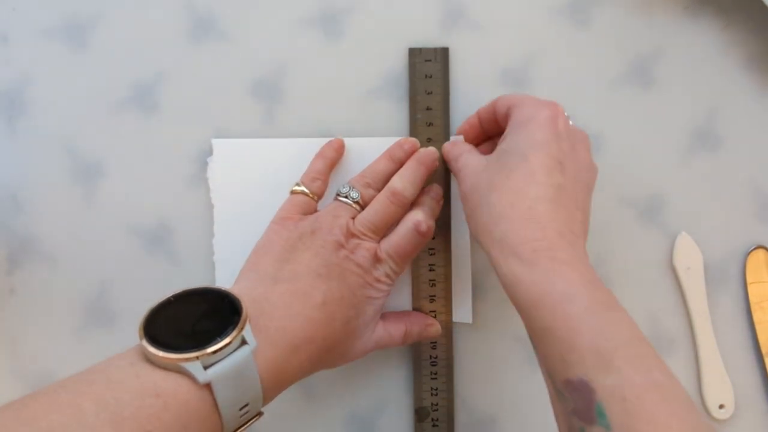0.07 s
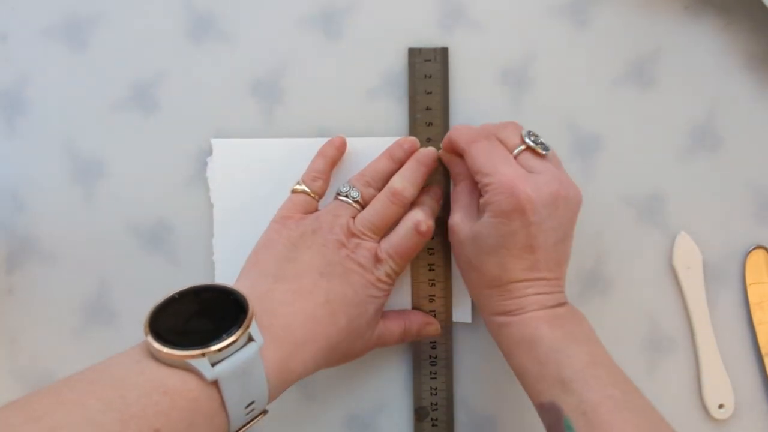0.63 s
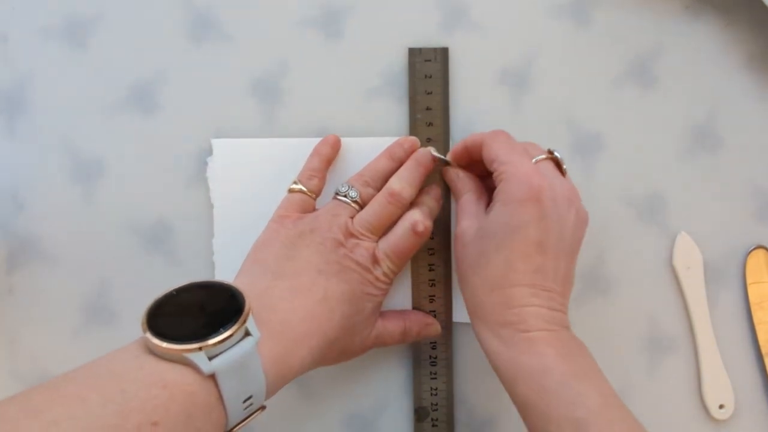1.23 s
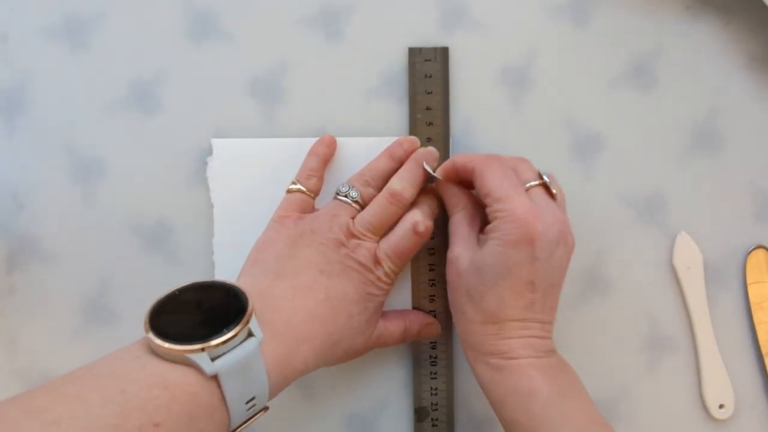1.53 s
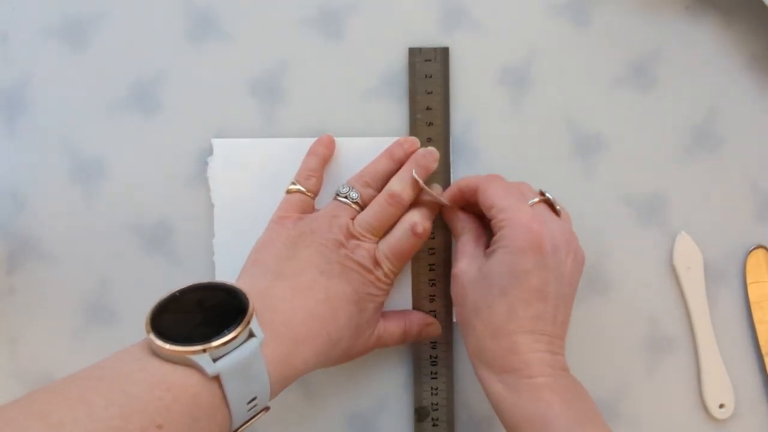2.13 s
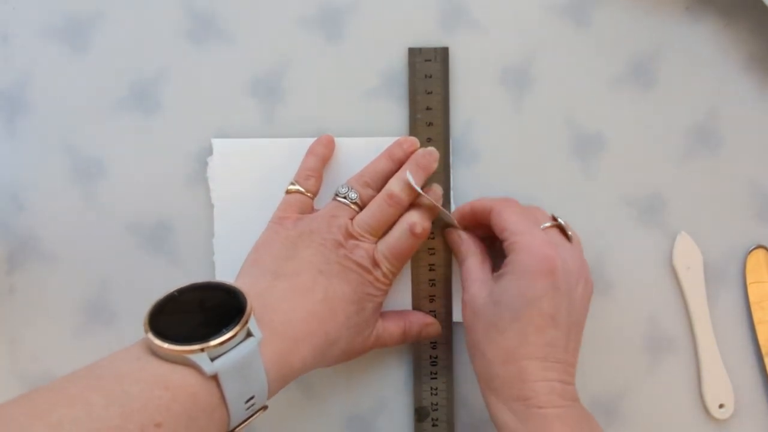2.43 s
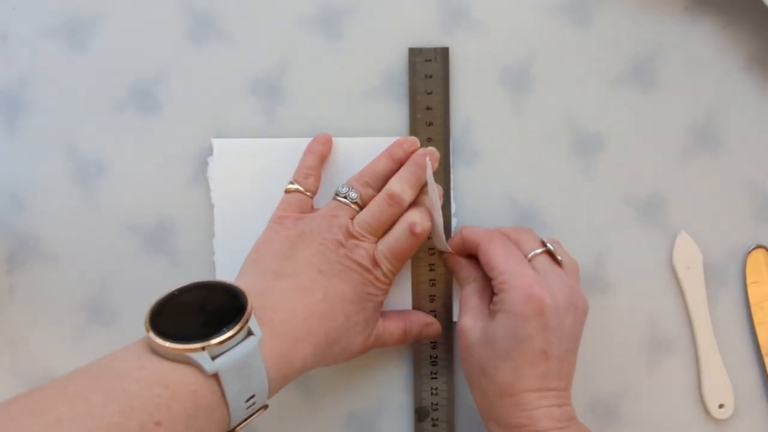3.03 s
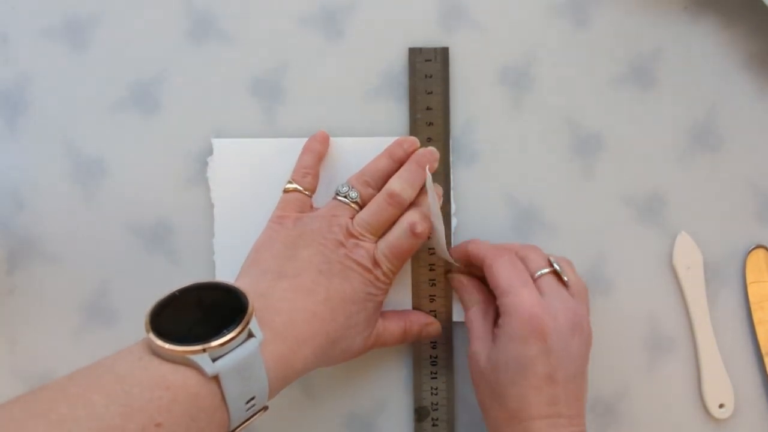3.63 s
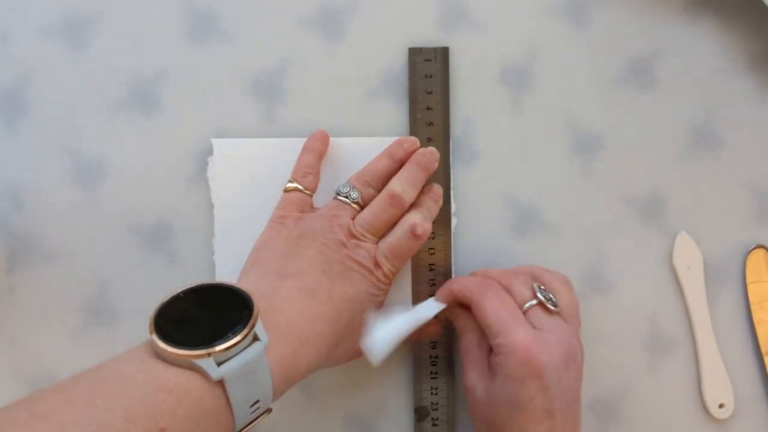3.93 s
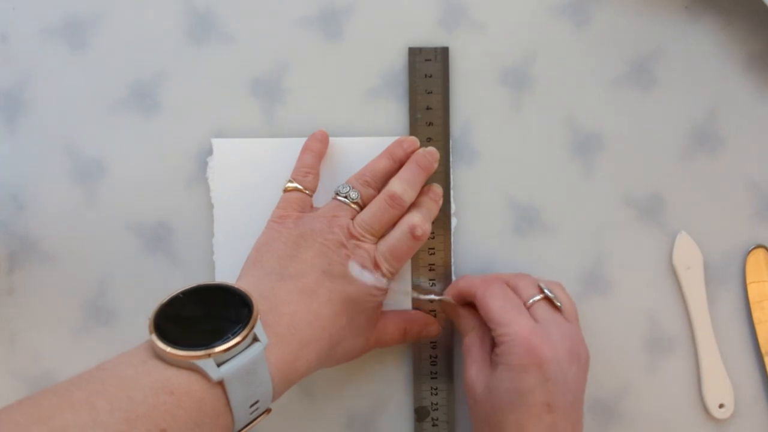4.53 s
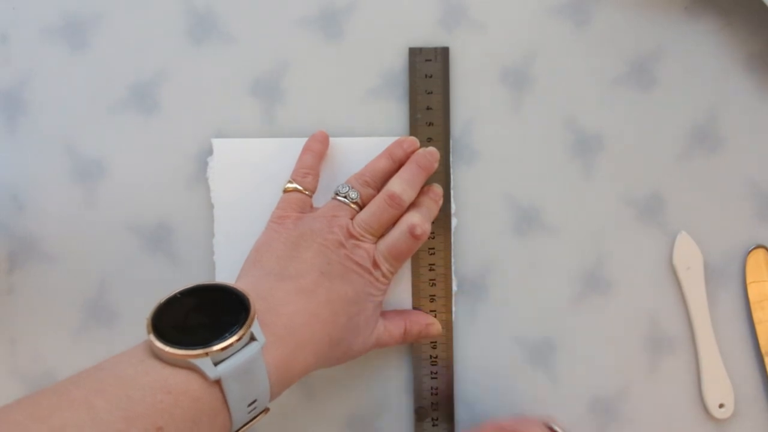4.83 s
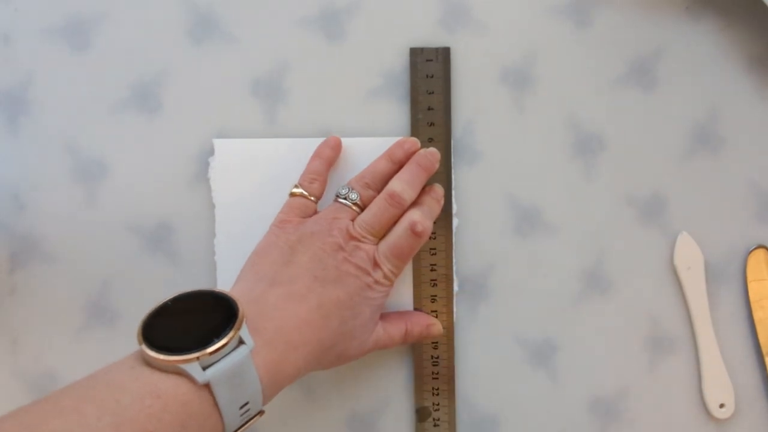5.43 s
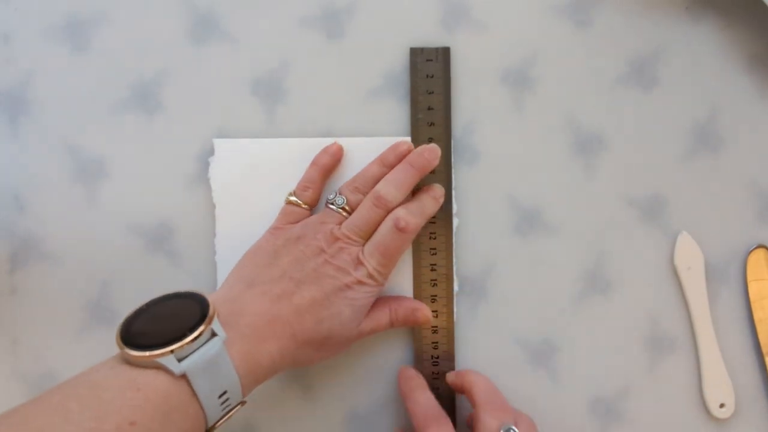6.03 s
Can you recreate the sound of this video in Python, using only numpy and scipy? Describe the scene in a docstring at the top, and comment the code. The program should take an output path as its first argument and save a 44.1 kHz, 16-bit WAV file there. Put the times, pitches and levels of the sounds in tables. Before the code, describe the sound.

Thick paper is torn along a steel ruler on a table, heard close in a small, quiet room. A finger rubs faintly on the sheet at first. From about 0.6 to 4.7 seconds the paper rips in eleven short tugs, roughly one every 0.4 seconds. Each is a dry, hissing crackle with small snaps and a soft thump through the table, strongest around 1.4, 1.8 and 4.7 seconds. Between tugs the paper rustles and the loose strip flaps softly. A distant engine drones low and faint, a little more noticeable from about 4 seconds. After a short pause, a finger brushes the sheet with a small tick at 5.5 seconds. From 6 seconds the ruler bumps and slides over the table with a brief scrape, ending in a light knock and a faint, high metallic ring at about 6.3 seconds.

```python
"""Tearing paper along a ruler

A strip of thick paper is torn off along a steel ruler in short tugs, on a craft table in a small room.
Each rip is a shower of breaking fibres that also flutters the loose strip and shakes the table.
A finger brushes the sheet; at the end the ruler slides away, ringing faintly. A far engine drones."""
import sys
import numpy as np
from scipy import signal
from scipy.fft import rfft, irfft, next_fast_len
from scipy.io import wavfile
from scipy.ndimage import uniform_filter1d

SR = 44100
rng = np.random.default_rng(int(sys.argv[2]) if len(sys.argv) > 2 else 0)


def put_to_file(sound):
    """Save the sound as 16-bit audio at rate SR, in the file named by the first command-line argument."""
    columns = np.atleast_2d(sound).T  # one column per channel
    safe = np.clip(columns, -1, 1)
    whole_steps = np.round(safe * 32767)
    wavfile.write(sys.argv[1], SR, whole_steps.astype(np.int16))


N = 277389
TIME = np.arange(N) / SR

# tugs that rip the paper; levels in all tables are relative:
# (time [s], rise [s], hold [s], crackle [dB], strain before it [dB], table shake [dB], strip boom [dB])
TUGS = [(0.632, 0.043, 0.014, -58, -73, -43, -60), (1.007, 0.016, 0.019, -47, -61, -37.5, -48),
        (1.378, 0.026, 0.038, -43.5, -73, -31.5, -40), (1.811, 0.015, 0.045, -43, -55.5, -35, -41),
        (2.176, 0.026, 0.06, -49.5, -52.5, -43, -69), (2.559, 0.052, 0.051, -46.5, -57, -39, -54.5),
        (2.989, 0.0016, 0.029, -54, -88, -35, -43.5), (3.398, 0.0063, 0.045, -53.5, -76, -41, -51.5),
        (3.803, 0.027, 0.061, -43, -65, -40.5, -41.5), (4.198, 0.012, 0.16, -60, -70, -48.5, -69),
        (4.613, 0.043, 0.064, -46.5, -78, -35.5, -37)]
# the growing strip: (time [s], flutter above crackle [dB], pitch [Hz])
STRIP = [(0.6, -2.5, 218), (1.9, -7.5, 189.7), (2.6, -4.5, 163), (3.0, 7.5, 164), (3.9, -1.5, 163.5),
         (4.6, 6.5, 163.3)]
# flaps of the slack strip: (middle [s], length [s], flutter [dB], low flap [dB])
FLAPS = [(0.705, 0.13, -83, -51.5), (1.183, 0.022, -70, -46.5), (1.592, 0.025, -58, -47),
         (3.302, 0.091, -84, -48), (3.653, 0.057, -56, -47), (3.7, 0.09, -58, -44.5),
         (4.534, 0.053, -62.5, -52)]
# spectrum of the singing steel edge: (frequency [Hz], level [dB])
SING = [(2500, -15.5), (5550, -9.5), (6100, 10.5), (6500, -3.5), (7200, -7.5), (11000, -10.5), (15800, -4)]


def amp(db):
    """Amplitude ratio of a level in decibels."""
    return 10 ** (np.asarray(db) / 20)


def unit(x):
    """Normalisation to rms 1."""
    return x / np.sqrt(np.mean(x ** 2) + 1e-20)


def read(points, hz):
    """Interpolation of a spectrum on a log-frequency axis."""
    f, value = np.transpose(points)
    return np.interp(np.log(hz + 1), np.log(f), value)


def add(mix, s, sound):
    """Superposition of a sound on the mix at time s."""
    part = mix[max(round(s * SR), 0):][:len(sound)]
    part += sound[:len(part)]


def colour(x, spectrum, size=4096):
    """Convolution with a minimum-phase response of energy 1 and the given spectrum."""
    log_gain = np.log(amp(read(spectrum, abs(np.fft.fftfreq(size, 1 / SR)))))
    response = np.exp(np.conj(signal.hilbert(log_gain)))
    ring = np.fft.ifft(response).real[:size // 2]
    return signal.oaconvolve(x, ring / np.linalg.norm(ring))[:N]


def resonate(x, hz, width):
    """Gliding resonance: two one-pole stages, each width Hz wide, follow the curve hz."""
    turn = np.exp(2j * np.pi * np.cumsum(hz) / SR)
    pole = np.exp(-np.pi * width / SR)
    once = signal.lfilter([1 - pole], [1, -pole], x / turn)
    return (turn * signal.lfilter([1 - pole], [1, -pole], once)).real


def steadied(x, span):
    """Division by the running rms over span seconds, which keeps the finer grain."""
    window = signal.windows.hann(int(span * SR))
    power = signal.oaconvolve(x ** 2, window / window.sum(), "same")
    return x / np.sqrt(abs(power) + 1e-9)


def crackle(per_s, spread_db, clump_db):
    """Shot noise: random impulses of unequal size, in clumps of a few milliseconds."""
    clumps = unit(uniform_filter1d(rng.standard_normal(N), 110))
    height = amp(spread_db * np.minimum(rng.exponential(1, N), 4) + clump_db * clumps)
    impulses = height * rng.choice([-1, 1], N) * (rng.random(N) < per_s / SR)
    return steadied(impulses, span=0.05)


def bursts(events, decay_s):
    """Transient excitation: a decaying noise burst per event, its energy set by column 1."""
    out, t = np.zeros(N), TIME[:SR // 20]
    for row, grain in zip(events, rng.standard_normal((len(events), len(t)))):
        burst = grain * np.exp(-t / decay_s)
        add(out, row[0], amp(row[1]) * burst / np.linalg.norm(burst))
    return out


def jolts(events, contact_s):
    """Contact force: a one-sided push per event, its impulse set by column 2."""
    out, u = np.zeros(N), TIME[:SR // 50] / contact_s
    push = u * np.exp(-u)
    for row in events:
        add(out, row[0], amp(row[2]) * push / push.sum())
    return out


def strokes(tables, column):
    """Amplitude envelope from a dB column of several strokes, silent between them."""
    gain = np.zeros(N)
    for rows in map(np.array, tables):
        gain = np.maximum(gain, amp(np.interp(TIME, rows[:, 0], rows[:, column], -np.inf, -np.inf)))
    return gain


def swell(rise, hold, release):
    """Envelope with linear rise, plateau and exponential decay."""
    t = TIME[:SR // 3]
    return np.minimum(t / max(rise, .001), 1) * np.exp(-np.maximum(t - rise - hold, 0) / release)


def arches(movements):
    """Incoherent addition: soft movements sum in power, one smooth arch each."""
    power = np.zeros(N)
    for s, length, db in movements:
        progress = np.arange(0, length, 1 / SR) / length
        arch = np.sin(np.pi * progress ** 0.96) ** 2.8
        add(power, s - length / 2, (amp(db) * arch) ** 2)
    return power


def room_tone():
    """Diffuse noise is coherent between two microphones only at long wavelengths."""
    # room noise: (frequency [Hz], level [dB])
    spectrum = [(25, -46.5), (62, 2.5), (100, -3.5), (160, -6), (280, -18), (450, -20), (900, -34),
                (1700, -41.5), (6000, -48), (9300, -54.5), (15800, -53.5)]
    hz = np.fft.rfftfreq(N, 1 / SR)
    shared, *own = rfft(rng.standard_normal((3, N)))
    coherence = 1 / (1 + (hz / 900) ** 2)
    noise = np.sqrt(coherence) * shared + np.sqrt(1 - coherence) * np.array(own)
    return amp(-60.5) * unit(irfft(noise * amp(read(spectrum, hz)), N))


def engine():
    """Periodic firing gives a far engine a harmonic series that wavers with its speed."""
    # harmonics: (multiple of the firing rate, level [dB])
    orders = [(3, -6.5), (4, 2), (5, -6), (7, -17)]
    # the engine's running: (time [s], firing rate [Hz], level [dB])
    running = [(0, 30.64, -83.5), (1.999, 32.09, -61.5), (3.501, 32.44, -66.5), (4.3, 33.15, -55),
               (4.9, 33.08, -54), (5.399, 33.43, -54), (5.65, 32.73, -58.5), (6.29, 32.5, -57)]
    s, rate, db = np.transpose(running)
    hz = np.fft.rfftfreq(N, 1 / SR)
    waver = unit(irfft(rfft(rng.standard_normal(N)) * np.exp(-hz / 6), N))
    cycles = np.cumsum(np.interp(TIME, s, rate) * (1 + 0.00689 * waver)) / SR
    drone = sum(amp(level) * np.sin(2 * np.pi * (k * cycles + rng.random())) for k, level in orders)
    return amp(np.interp(TIME, s, db)) * unit(drone)


def finger():
    """Sliding friction of skin on paper makes soft noise; stick-slip makes one brief judder."""
    # brushes over the sheet, one list a stroke: (time [s], level [dB])
    brushes = [
        [(0.1, -89), (0.16, -71.5), (0.23, -86), (0.42, -71), (0.62, -77.5)],
        [(3.98, -67.5), (4.1, -63.5), (4.18, -102)],
        [(5.548, -56), (5.556, -58), (5.58, -71.5), (5.66, -81)],
    ]
    # skin on paper: (frequency [Hz], level [dB])
    skin = [(100, -2), (450, 9.5), (800, -4), (1400, -3.5), (2200, -3), (4000, -13.5), (15000, -34.5)]
    rub = crackle(per_s=9000, spread_db=2, clump_db=1.5)
    out = amp(5) * colour(rub * strokes(brushes, column=1), skin)
    grip_s, judder_s, judder_hz = 0.422, 0.08, 131.5
    t = TIME[:int(judder_s * SR)]
    envelope = signal.windows.tukey(len(t), .5) * np.exp(-t / judder_s)
    add(out, grip_s, amp(-43) * np.sin(2 * np.pi * judder_hz * t) * envelope)
    return out


def tearing():
    """Fracture of fibres radiates a hiss and forces the steel edge, strip and table to vibrate."""
    # fibres give way or the sheet buckles: (time [s], snap [dB], jolt to the table [dB])
    snap_events = [(0.419, -51.5, -43), (0.521, -53, -53), (0.541, -52, -30.5), (0.618, -55, -71),
                   (0.71, -42, -37), (0.874, -57.5, -60), (0.984, -46, -41), (1.004, -40, -31),
                   (1.025, -31.5, -25), (1.383, -31, -27), (1.411, -27, -19), (1.784, -41, -34.5),
                   (1.822, -31, -13.5), (1.902, -38.5, -58), (2.133, -54.5, -56.5), (2.144, -41, -60),
                   (2.248, -30.5, -52.5), (2.429, -51, -68), (2.485, -44.5, -34), (2.521, -43, -40),
                   (2.761, -40.5, -66), (2.845, -36.5, -52), (2.991, -36, -38), (3.004, -40, -29.5),
                   (3.054, -38, -52), (3.131, -47, -56), (3.407, -40.5, -24), (3.788, -44.5, -36),
                   (3.813, -39, -45), (4.221, -38, -62), (4.361, -41, -57), (4.623, -42, -48),
                   (4.635, -38, -47), (4.72, -30, -18.5), (5.553, -44.5, -54), (5.908, -68, -41.5)]
    # spectra of breaking fibres, fluttering strip and table: (frequency [Hz], level [dB])
    fibre_spectrum = [(600, -7.5), (1150, -7), (1700, -12), (2300, -4.5), (3100, -10), (3900, -1.5),
                      (5300, -5), (6350, -0.5), (7600, -2), (10800, 0), (12800, -1.5), (15800, -5.5)]
    flutter_spectrum = [(150, -1), (330, 2.5), (480, 3), (590, -1), (730, 1.5), (930, -6), (1140, -5),
                        (1500, -15), (2200, -10.5), (3000, -13), (4500, -16), (12000, -29.5)]
    table_spectrum = [(25, -42), (48, -7.5), (72, 2), (100, 4), (130, -7.5), (163, 2), (200, -12),
                      (235, -8.5), (280, -14.5), (325, -10.5), (420, -23.5), (900, -43)]
    crackling, fluttering, shaking = effort()
    # a gentle pull breaks fibres one by one; a hard one merges them into a rasp
    merge_db = -52.5
    gentle = 1 / (1 + (crackling / amp(merge_db)) ** 2)
    ticking = crackle(per_s=6000, spread_db=3.9, clump_db=2.2)
    rasp = crackle(per_s=9000, spread_db=3.7, clump_db=1.4)
    fibres = np.sqrt(gentle) * ticking + np.sqrt(1 - gentle) * rasp
    snaps = bursts(snap_events, decay_s=0.0009)
    fracture = fibres * crackling + amp(14.5) * snaps
    hiss = amp(-2.5) * colour(fracture, fibre_spectrum)
    edge = amp(-6.5 - 7 * TIME) * colour(fracture, SING)  # the ruler sings most near its free end
    flutter = amp(-0.5) * colour(fibres * fluttering + snaps, flutter_spectrum)
    shake = amp(-4) * steadied(colour(fibres, table_spectrum), span=0.13) * shaking
    thump = amp(15.5) * colour(jolts(snap_events, contact_s=0.000436), table_spectrum)
    return hiss + edge + flutter + shake + thump + strip_boom(fibres)


def effort():
    """Common modulation: the same tugs and grips set the gains of crackle, flutter and shaking."""
    # the paper bends under a new grip: (middle [s], length [s], crackle [dB])
    rustles = [(0.539, 0.054, -55.5), (0.819, 0.078, -63.5), (1.176, 0.056, -58.5), (1.217, 0.073, -66),
               (1.522, 0.042, -59), (1.566, 0.035, -62.5), (1.635, 0.082, -61), (1.978, 0.043, -55),
               (2.048, 0.064, -66), (2.357, 0.089, -62.5), (2.374, 0.031, -55.5), (2.429, 0.043, -50.5),
               (2.789, 0.11, -55.5), (2.85, 0.071, -53.5), (3.084, 0.23, -58.5), (3.236, 0.13, -58.5),
               (3.296, 0.058, -57), (3.556, 0.092, -58.5), (3.628, 0.055, -55), (3.987, 0.043, -51.5),
               (4.084, 0.12, -62.5), (4.136, 0.048, -51), (4.461, 0.021, -60.5), (5.579, 0.051, -64.5)]
    # the held strip stirs faintly: (time [s], crackle [dB])
    held = [(0.5, -101), (2.0, -82.5), (5.1, -87)]
    handling = strain() + arches(rustles) + strokes([held], column=1) ** 2
    crackling = tugs(column=3, release=0.015) + handling
    s, flutter_db, _ = np.transpose(STRIP)
    looseness = amp(np.interp(TIME, s, flutter_db))
    fluttering = looseness ** 2 * (tugs(column=3, release=0.016) + amp(-7) ** 2 * handling)
    fluttering += arches(flap[:3] for flap in FLAPS)
    # a grip shakes the table for longer than it rustles, and only a little more when it is louder
    grips = [(middle, 2.12 * length, -45.5 + 0.23 * (db + 47)) for middle, length, db in rustles]
    shaking = tugs(column=5, release=0.029) + arches(grips)
    return np.sqrt([crackling, fluttering, shaking])


def strain(lead_s=0.046, rise_s=0.039):
    """Rising stress breaks the first fibres just before each rip; returns their power."""
    power = np.zeros(N)
    envelope = swell(rise_s, lead_s - rise_s, release=0.019)
    for s, _, _, _, db, _, _ in TUGS:
        add(power, s - lead_s, (amp(db) * envelope) ** 2)
    return power


def tugs(column, release):
    """Loading and relaxation: each rip builds, runs and dies; returns the power of one dB column."""
    power = np.zeros(N)
    for row in TUGS:
        s, rise, hold = row[:3]
        add(power, s, (amp(row[column]) * swell(rise, hold, release)) ** 2)
    return power


def strip_boom(fibres):
    """Membrane modes: the jerked strip booms like a sail, lower and fuller as it lengthens."""
    # modes of the strip: (multiple of its pitch, width [Hz], level [dB])
    modes = [(1, 55, 0), (2, 45.5, -6), (4.4, 113.3, -12.5), (6.8, 119, -19)]
    full_hz, overtone_db_per_octave = 166, -27.5
    s, _, pitch = np.transpose(STRIP)
    hz = np.interp(TIME, s, pitch)
    overtones = amp(overtone_db_per_octave * np.log2(hz / full_hz))
    boom = sum(amp(db) * (overtones if k > 1 else 1) * unit(resonate(fibres, k * hz, width))
               for k, width, db in modes)
    return steadied(boom, span=0.14) * np.sqrt(tugs(column=6, release=0.0037))


def flapping():
    """Air displacement: the slack strip bellies in and out with a soft, low flap."""
    # the bellying strip: (frequency [Hz], level [dB])
    belly = [(50, -12), (90, 7), (160, 2.5), (240, 0), (330, 0.5), (420, -9.5), (700, -17.5), (2500, -50)]
    air = steadied(colour(rng.standard_normal(N), belly), span=0.038)
    return air * np.sqrt(arches((s, length, db) for s, length, _, db in FLAPS))


def ruler():
    """Friction makes the sliding steel scrape and sing; impacts leave its modes in free decay."""
    # the slide: (time [s], scrape [dB], table shake [dB], singing [dB])
    slide = [(5.99, -97, -47, -99), (6.015, -99, -34, -101), (6.07, -99, -40.5, -103),
             (6.11, -81, -48, -66), (6.146, -49.5, -58, -54.5), (6.178, -70, -41, -68),
             (6.2, -76, -47, -51), (6.215, -72, -48, -51), (6.226, -77, -48, -66), (6.245, -65, -25.5, -55),
             (6.26, -40.5, -34, -55), (6.29, -46.5, -47, -54)]
    # knocks on the table: (time [s], tick [dB], jolt [dB], ring [dB])
    knocks = [(6.011, -78, -26, -91), (6.025, -52, -64, -52.5), (6.256, -34, -26, -46),
              (6.273, -36, -46, -65)]
    # modes of the ruler: (frequency [Hz], level [dB], 60 dB decay time [s])
    steel = [(6220, -2, 0.028), (6030, 10, 0.015), (7630, -10, 0.06), (8450, -7, 0.04)]
    # spectra of the scraping edge and the rumbling table: (frequency [Hz], level [dB])
    scrape_spectrum = [(200, 19.5), (550, 4), (720, 8), (1400, -2.5), (2000, 0), (2600, 8), (3300, -3),
                       (5400, -5.5), (6500, -17), (11000, -5.5), (15800, -33)]
    rumble_spectrum = [(30, -53), (65, 12), (130, -6), (195, 4.5), (300, -6), (450, -10), (900, -46)]
    grit = crackle(per_s=9000, spread_db=3, clump_db=2)
    ticks = bursts(knocks, decay_s=0.002)
    scrape = amp(5.5) * colour(grit * strokes([slide], column=1), scrape_spectrum)
    sing = colour(grit * strokes([slide], column=3) + amp(19) * ticks, SING)
    t, ring = TIME[:SR // 3], np.zeros(N)
    modes = sum(amp(db - 60 * t / t60) * np.sin(2 * np.pi * hz * t) for hz, db, t60 in steel)
    for s, _, _, ring_db in knocks:
        add(ring, s, amp(ring_db) * modes)
    shake = amp(-10.5) * steadied(colour(grit, rumble_spectrum), span=0.064) * strokes([slide], column=2)
    thump = amp(12.5) * colour(jolts(knocks, contact_s=0.00012), rumble_spectrum)
    return scrape + sing + ring + shake + thump


def reflections(t60, build_s):
    """Diffuse reflections build up and decay exponentially; each microphone has its own, of energy 1."""
    t = TIME[:SR // 2]
    taps = rng.standard_normal((2, len(t))) * (rng.random((2, len(t))) < .2)
    taps *= np.exp(-np.log(1000) * t / t60) * (1 - np.exp(-t / build_s))
    return taps / np.linalg.norm(taps, axis=1, keepdims=True)


def propagate(x, direct_treble_db, room_db, right_lag_samples=10, sets=11, turn_s=0.035):
    """Multipath propagation: direct sound, scattering off the moving hands, and room reverberation."""
    # long waves pass the hands and reach both microphones nearly alike
    treble = signal.lfilter(*signal.butter(1, 850, "high", fs=SR), x)
    direct = x - (1 - amp(direct_treble_db)) * treble
    out = np.array([direct, np.pad(direct, (right_lag_samples, 0))[:N]])
    for k in range(sets):
        # sets of reflections take turns in an equal-power crossfade
        away = (TIME / turn_s - k + sets / 2) % sets - sets / 2
        part = treble * np.cos(np.pi / 2 * np.minimum(abs(away), 1))
        hands = reflections(t60=0.019, build_s=0.00027)[:, :SR // 20]
        out += amp(-0.58) * signal.oaconvolve(part[None], hands, axes=1)[:, :N]
    # the furnished room absorbs the highest treble
    wet = signal.lfilter(*signal.butter(1, [240, 9500], "band", fs=SR), x)
    room = reflections(t60=0.098, build_s=0.023)
    return out + amp(room_db) * signal.oaconvolve(wet[None], room, axes=1)[:, :N]


def microphones(pair):
    """The two microphones differ in level and phase by frequency, at constant total power gain."""
    # left minus right: (frequency [Hz], level [dB])
    tilt = [(450, 0), (1050, -3), (2000, 3), (3800, 4.5), (4700, 2.5), (6500, 4.5), (7500, 12), (8500, 6.5),
            (10000, 1.5), (13000, 0.5)]
    # the right microphone's port turns its phase against the left: (frequency [Hz], phase [rad])
    port_phase = [(4500, 0), (6300, 1.9), (9500, 3.4), (12500, 5.5)]
    size = next_fast_len(N + SR, True)
    hz = np.fft.rfftfreq(size, 1 / SR)
    sides = amp(np.outer([.5, -.5], read(tilt, hz)))
    sides /= np.sqrt(np.mean(sides ** 2, axis=0))
    ports = np.exp(1j * np.outer([-.5, .5], read(port_phase, hz)))
    return irfft(rfft(pair, size) * ports * sides, size)[:, :N]


def scene():
    """Superposition of all sources at the two microphones."""
    craft = tearing() + flapping() + finger() + ruler()
    arriving = propagate(craft, direct_treble_db=-5.5, room_db=-9.5)
    return microphones(arriving) + room_tone() + engine()


def record(dry):
    """Band limiting removes the lowest rumble and the highest treble."""
    lean = signal.sosfilt(signal.butter(4, 42, "high", fs=SR, output="sos"), dry)
    lowpass = signal.firwin(511, 15950, window=("kaiser", 9), fs=SR)
    return signal.oaconvolve(lean, lowpass[None], "same", axes=1)


dry = scene()
out = record(dry)
put_to_file(out)
```